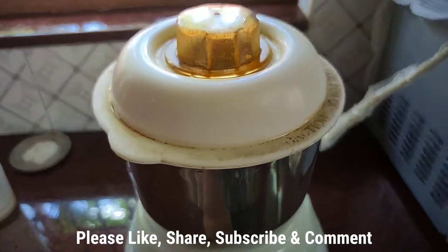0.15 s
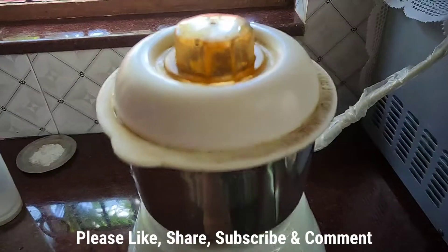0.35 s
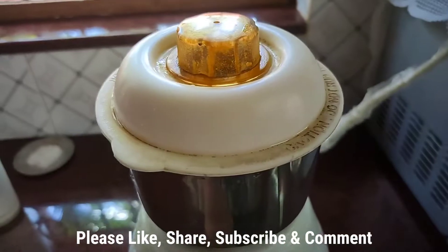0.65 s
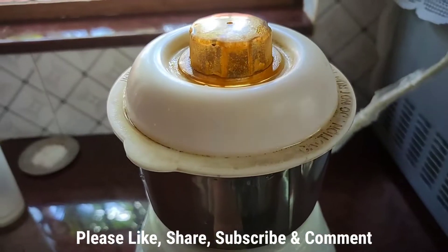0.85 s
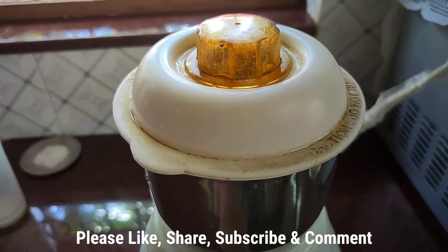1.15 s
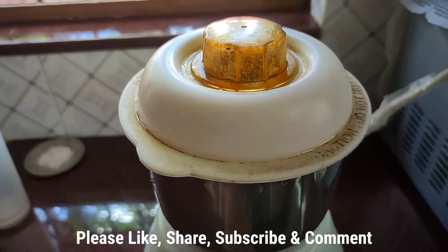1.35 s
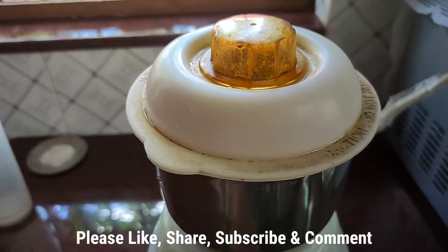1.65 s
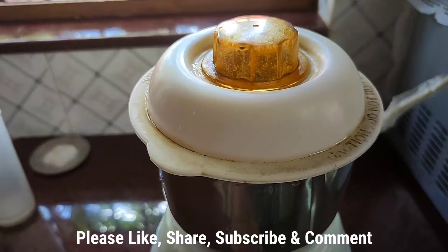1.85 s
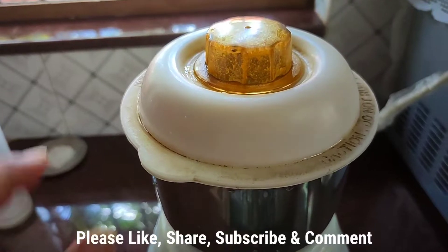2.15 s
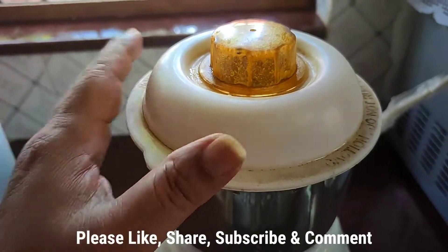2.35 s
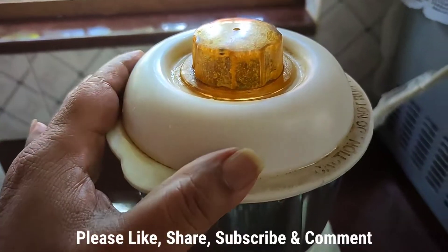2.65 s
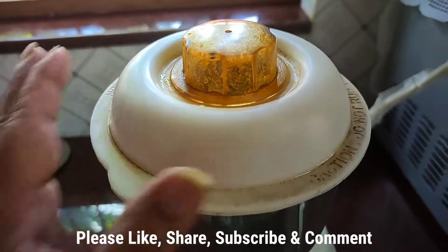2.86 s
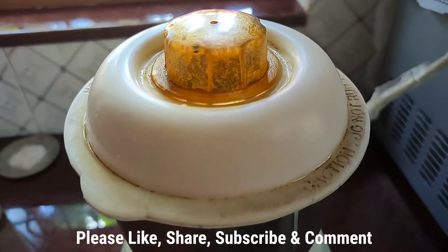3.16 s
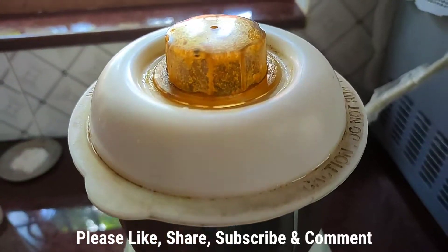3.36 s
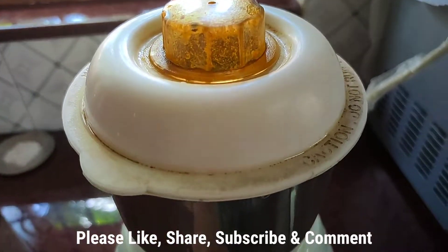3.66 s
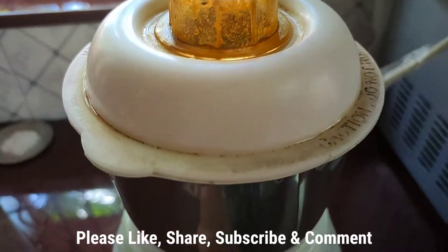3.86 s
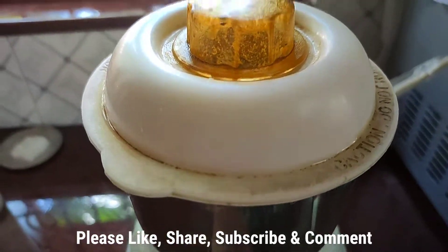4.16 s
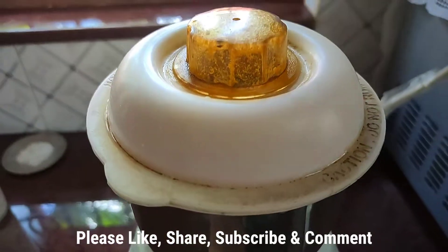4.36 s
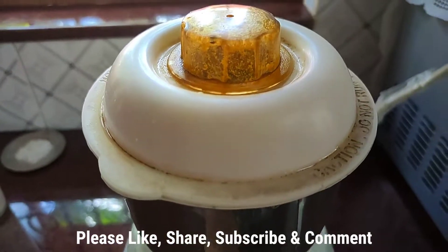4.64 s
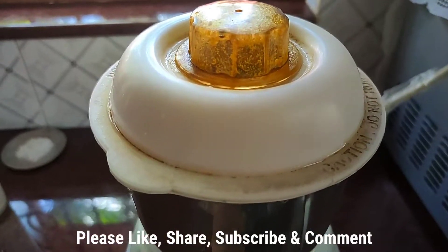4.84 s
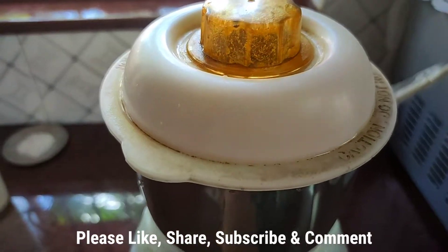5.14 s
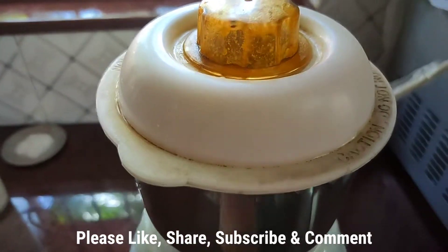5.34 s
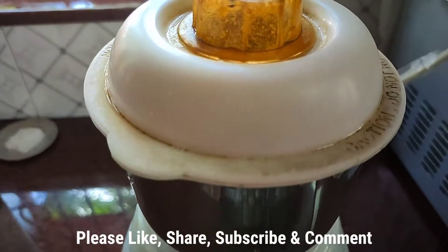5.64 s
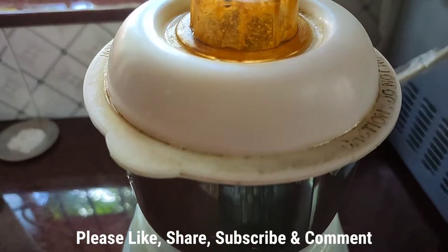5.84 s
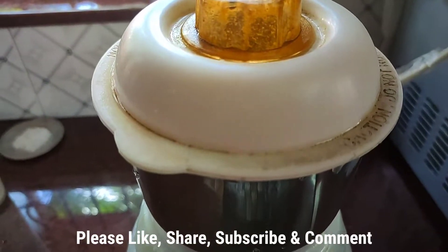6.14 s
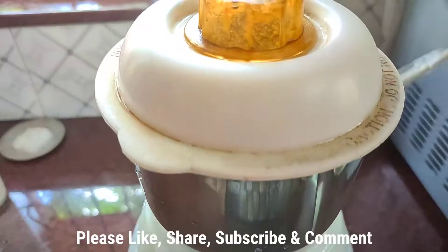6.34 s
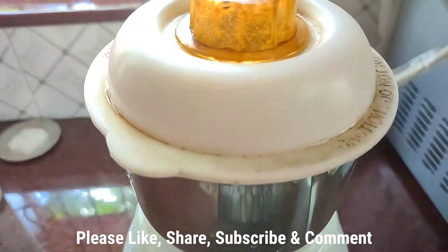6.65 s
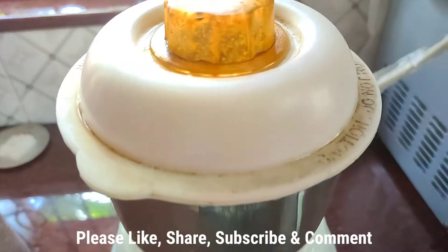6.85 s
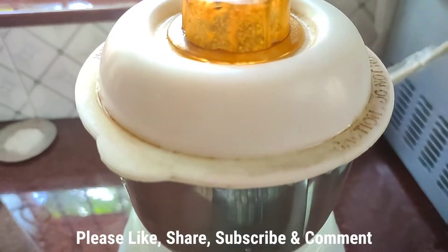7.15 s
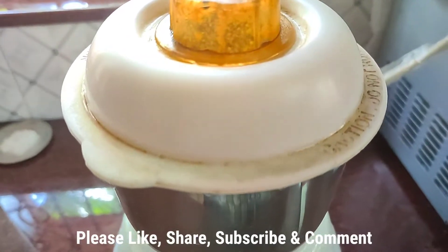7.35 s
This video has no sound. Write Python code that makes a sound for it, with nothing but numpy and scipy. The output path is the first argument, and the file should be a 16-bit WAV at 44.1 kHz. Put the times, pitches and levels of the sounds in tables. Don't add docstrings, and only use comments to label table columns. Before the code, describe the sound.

Close, harsh mixer-grinder noise in two bursts with rattling grit and wet spray, separated by a quiet hum-filled pause with small plastic ticks.

```python
import sys
import numpy as np
from scipy import signal
from scipy.fft import rfft, irfft, next_fast_len
from scipy.io import wavfile
from scipy.ndimage import uniform_filter1d, map_coordinates

SR = 44100
rng = np.random.default_rng(int(sys.argv[2]) if len(sys.argv) > 2 else 0)


def dump_mix(stems):
    frames = np.atleast_2d(stems).T
    limited = np.clip(frames, -1, 1)
    pcm = np.round(limited * 32767).astype(np.int16)
    wavfile.write(sys.argv[1], SR, pcm)


def elevation(decibels):
    levels = np.asarray(decibels, float)
    return 10 ** (levels / 20)


N = 330750


def unit(x):
    return x / np.sqrt(np.mean(x ** 2) + 1e-20)


def along(points, hz):
    f, value = np.transpose(points)
    return np.interp(np.log(hz + 1), np.log(f + 1), value)


def curves(*tables):
    t = np.arange(N) / SR
    s, *columns = np.transpose(np.concatenate(tables))
    on = sum((t >= rows[0][0]) & (t <= rows[-1][0] + .01) for rows in tables)
    return [np.interp(t, s, column) for column in columns] + [uniform_filter1d(on * 1., size=130)]


def wobble(rate):
    knots = rng.standard_normal(int(N * rate / SR) + 4)
    return map_coordinates(knots, [np.arange(N) * rate / SR])


def filtered(x, response):
    m = next_fast_len(N + SR // 2)
    return irfft(rfft(x, m) * response(np.fft.rfftfreq(m, 1 / SR)), m)[..., :N]


def rush(spectrum, alike):
    def mid_and_side(hz):
        turn = np.arccos(np.clip(along(alike, hz), -1, 1)) / 2
        return elevation(along(spectrum, hz)) * [np.cos(turn), np.sin(turn)]

    mid, side = filtered(rng.standard_normal((2, N)), mid_and_side)
    return unit(np.array([mid + side, mid - side]))


def ringing(modes):
    def response(f):
        total = 0
        for k, (centre, width, db) in enumerate(modes):
            total = total + (-1) ** k * elevation(db) * 1j * f * width / (centre ** 2 - f ** 2 + 1j * f * width)
        return total

    return response


def resonance(hz, centre_hz, width_hz):
    return 1 / (1 + ((hz - centre_hz) / width_hz) ** 4)


def bursts(rate, spread_db, t60):
    hit = rng.random(N) < rate / SR
    size = elevation(spread_db * np.minimum(rng.exponential(size=N), 4))
    return unit(signal.lfilter([1], [1, -elevation(-60 / (t60 * SR))], hit * size))


def blows(rows, gain_db, t60):
    out, t = np.zeros(N + SR), np.arange(SR // 3) / SR
    for s, db, life in np.broadcast(rows[:, 0], gain_db, t60):
        out[round(s * SR):][:len(t)] += elevation(db - 60 * t / np.clip(life, .004, .4))
    return out[:N]


SWITCH_S = (2.8, 4.838, 7.3195)
REST_START_S, RESTART_S, SCENE_CHANGE_S = SWITCH_S
FULL_HZ = 214
# start_s [s], pitch_hz [turns per s]
SHAFT_SPEED = [
    [(0, 135), (.12, 148), (.28, 176.7), (.42, 186), (.58, 202), (1, 213), (1.3, 214), (1.55, 165),
     (2.5, 35)],
    [(4.85, 95), (5.05, 162.6), (5.11, 174.4), (5.2, 183.5), (5.33, 198), (5.46, 204.5), (5.7, 210),
     (6.3, 213.5), (7.318, 212.5)],
]


def motor():
    hz, on = curves(*SHAFT_SPEED)
    octaves, now = np.log2(hz / FULL_HZ), np.arange(N) / SR
    first_run = now < REST_START_S
    coasting = (now > 1.32) & first_run
    drift_db = 4.5
    shaft_db = -37.5 - 16 * octaves ** 2 + drift_db * wobble(5)
    blade_db = -38 + 16 * octaves + 9 * resonance(4 * hz, 832, 32) + drift_db * wobble(5)
    coarse_db = -5 * first_run
    slot_db = -45 + 25 * resonance(12 * hz, 2225, 190) - 12 * coasting
    slot_rough = np.where(first_run, 1.6, .7)
    vane_db = -34 + 120 * np.log10(hz / FULL_HZ)
    bar_db = slot_db - 20 + 15 * resonance(24 * hz, 4240, 105)
    turn = 2 * np.pi * np.cumsum(hz * (1 + .004 * wobble(25))) / SR
    lag = np.array([[0], [1]])

    def tone(order, db, rough):
        level = elevation(db + 2.5 + 3 * wobble(45))
        return level * np.sin(order * (turn + .05 * lag) + rough * wobble(130))

    unbalance = tone(1, shaft_db, .25) + tone(2, shaft_db - 8, .5)
    blades = tone(4, blade_db - 3.5 + coarse_db, .7)
    slots = tone(12, slot_db - 1.5, slot_rough)
    vanes = tone(14, vane_db + 2, .4)
    bars = tone(24, bar_db, 1.1)
    return on * (unbalance + blades + slots + vanes + bars)


# start_s [s], level_db [dB]
PASTE_LOAD = [
    [(0, -29.5), (.15, -21), (.32, -17.5), (1.1, -18.5), (1.7, -21), (2.1, -20), (2.45, -33), (2.6, -46.5),
     (2.8, -72)],
    [(4.84, -39), (4.86, -21.5), (5, -20), (5.3, -19.5), (5.9, -17), (6.2, -20), (6.6, -16.5), (7.05, -16),
     (7.32, -19)],
]
# start_s [s], depth_db [dB], length_s [s]
LULLS = [(0.101, 8.5, 0.02), (1.227, -0.5, 0.013), (1.387, 2.5, 0.013), (1.484, 2, 0.0089),
         (1.837, 1.5, 0.038), (1.973, 7, 0.037), (2.07, 7, 0.032), (2.206, 6, .035), (2.315, 5.5, 0.043),
         (2.424, 6, 0.0089), (4.933, 6.5, .03), (5.054, 4, 0.022), (5.275, 2.5, 0.017), (6.11, 3, 0.018),
         (6.254, 0, 0.013), (6.968, 1.5, 0.04)]


def load():
    load_db, on = curves(*PASTE_LOAD)
    now = np.arange(N) / SR
    lull_db = sum(db * np.exp(-((now - s) / length) ** 2) for s, db, length in LULLS)
    stop_db = 75 * np.maximum(now - 2.47, 0) * (now < RESTART_S)
    over_db = load_db + 18
    jar_db = load_db - lull_db
    housing_db = -25 + 0.83 * over_db - 0.34 * lull_db
    spray_db = -21.5 + 0.79 * over_db - 1.5 * lull_db - stop_db
    return jar_db, housing_db, spray_db, on


FLAT = [(20, 0)]
# pitch_hz [Hz], width_hz [Hz], level_db [dB]
JAR = [(832, 45, -3), (1510, 95, 2), (1750, 150, -5), (1960, 100, -4), (2160, 120, -1), (2550, 150, -4),
       (2855, 85, 2), (3125, 40, -3), (3428, 32, -1), (3870, 40, -3), (4156, 55, -5), (4346, 60, -5)]
# pitch_hz [Hz], level_db [dB per Hz]
HOUSING = [(24, -47.5), (40, -14.5), (107, -20), (182, -6.5), (205, -9), (242, -0.5), (307, 2), (395, 2),
           (565, -8.5), (819, 0), (896, -7), (1120, -15), (1400, -1.5), (1820, -35), (3080, -120)]
# pitch_hz [Hz], level_db [dB per Hz]
WASH = [(590, -44.5), (1000, -5.5), (1270, -12.5), (1490, -3), (1860, -4), (2750, -3), (3250, -7),
        (5500, -12.5), (7400, -72)]
# pitch_hz [Hz], level_db [dB per Hz]
SPRAY = [(2650, -41), (4500, -3.5), (5770, -2.5), (11300, 1), (12300, -0.5), (13400, -4), (15200, -2),
         (16000, -31)]
# pitch_hz [Hz], likeness [-1 to 1]
NEAR_ALIKE = [(60, 0.45), (130, 0.62), (290, 0.93), (640, 0.79), (1410, 0.26), (3100, 0.035),
              (6820, 0.0225), (15000, 0.047)]


def churn():
    jar_db, housing_db, spray_db, on = load()
    slop = bursts(70, spread_db=3.5, t60=0.1)
    grit = bursts(500, spread_db=3, t60=0.019)
    pelt = unit(0.48 + 0.43 * slop + 0.38 * grit)
    wall = unit(filtered(pelt * rush(FLAT, NEAR_ALIKE), ringing(JAR)))
    jar = unit(wall + elevation(-1.0) * pelt * rush(WASH, NEAR_ALIKE))
    housing = unit((2.0 + 0.1 * slop) * elevation(0.91 * wobble(30)) * rush(HOUSING, NEAR_ALIKE))

    drops = rush(SPRAY, NEAR_ALIKE)
    below_fine = filtered(drops, lambda hz: 1 / (1 + (hz / 10000) ** 8))
    coarse = filtered(below_fine, lambda hz: 1 / (1 + (hz / 7500) ** 8))
    spray = 0
    for size in (coarse, below_fine - coarse, drops - below_fine):
        splash = 0.3 + 0.39 * slop + .5 * bursts(700, spread_db=3.0, t60=0.0069)
        spray = spray + elevation(2.4 * wobble(20)) * splash * size
    return on * (elevation(jar_db + 1.5) * jar + elevation(housing_db + 1.0) * housing + elevation(spray_db + 4.5) * unit(spray))


# [spray share, dB]
LUMPS = [(.008, -3, -12.5), (0.065, -7.5, -2.5), (0.131, -3.5, -2.5), (0.265, -3, -2.5), (.309, -10, -11.5),
         (.394, -10, -6.5), (.562, -7.5, -9), (0.58, 0, -6.5), (.686, -9, -2.5), (0.726, -5, 2),
         (.942, -13, -11), (1.065, -4.5, -10), (1.142, -5, -4), (1.174, 2, -13), (1.302, 3, -2.5),
         (1.43, -1.5, -2.5), (1.518, -8, 4), (1.582, -5, -7.5), (1.654, -17, -13.5), (1.711, -4, -12.5),
         (1.745, -3.5, -8), (1.815, -13, -19), (1.878, -5, -6), (2, -4, -7), (2.055, -11.5, -8),
         (2.134, -8, -5.5), (2.191, -14, -19), (2.244, -5, -7.5), (2.367, -8.5, -10), (2.44, -17.5, -14),
         (4.852, -20.5, 0.5), (4.885, -11, 0), (4.933, -12.5, -9.5), (4.966, -14.5, -3),
               (5.003, -4, -18), (5.036, -2, -6), (5.19, -3, -2), (5.31, 1, -11), (5.39, -4, 1),
               (5.458, -3, -12.5), (5.591, -4.5, -15), (5.663, 0.5, -6.5), (5.733, -10.5, -13.5),
               (5.868, -9, 2), (5.929, -0.5, -4.5), (6.165, -5, -0.5), (6.275, 1, -5), (6.35, -1.5, -6.5),
               (6.385, -1, -8.5), (6.513, -5.5, -7.5), (6.586, -3, -7), (6.644, -11.5, -14),
               (6.684, -1, -10.5), (6.726, -8, 0.5), (6.881, 1, -7.5), (6.949, -5.5, -23.5),
               (7.015, -2, -12), (7.065, 3, -4.5), (7.145, -4, -11.5), (7.206, -4, -11)]
# start_s [s], level_db [peak dB]
SEEDS = [(0.0295, 0), (0.1248, -5), (0.213, -7.5), (0.3336, -2.5), (.4304, -11), (0.5584, -5), (0.6318, -3),
         (0.812, 1.5), (0.9654, -6.5), (1.1398, -5.5), (1.501, -5.5), (1.711, -6.5), (1.8106, -12),
         (1.884, -11), (1.9962, -3.5), (2.016, -4), (2.0697, -9.5), (2.135, -9), (2.28, -8.5),
         (2.4334, -25), (2.5474, -26.5), (2.701, -35.5), (4.8393, -11.5), (4.893, -10), (4.987, -6),
         (5.764, -2), (6.0313, -6), (6.1755, 13), (6.405, 1), (6.972, -5)]


def lumps():
    rows, seeds = np.array(LUMPS), np.array(SEEDS)
    lump_db, spray_share_db = rows[:, 1], rows[:, 2]
    t60_s, swell_s, spray_swell_s = 0.087, .014, .007
    rasp = uniform_filter1d(blows(rows, lump_db + 4.3, t60_s), size=round(swell_s * SR))
    wall = filtered(rasp * rush(FLAT, NEAR_ALIKE), ringing(JAR))
    scrape = elevation(-17.5) * rasp * rush(WASH, NEAR_ALIKE)
    thud = elevation(-19) * rasp * rush(HOUSING, NEAR_ALIKE)
    throw = blows(rows, lump_db + spray_share_db - 6, 1.4 * t60_s)
    spray = uniform_filter1d(throw, size=round(spray_swell_s * SR)) * rush(SPRAY, NEAR_ALIKE)
    bright = [(2500, -47.0), (5000, -7.5), (9000, 0.5), (16000, -3.5)]  # (Hz, dB per Hz)
    crack = blows(seeds, seeds[:, 1] + 1, 0.015) * rush(bright, NEAR_ALIKE)
    return wall + scrape + thud + spray + crack


# pitch_hz [Hz], width_hz [Hz], level_db [dB]
BASE = [(151, 42, 1), (233, 62, -9), (389.6, 26, 6.5)]
# start_s [s], level_db [dB]
BUMPS = [
    (.128, -23),
    (.6, -29),
    (1.3, -27.5),
    (1.995, -30.5),
    (5.21, -29),
]
# start_s [s], level_db [dB]
KICKS = [
    (.135, -40.5),
    (4.85, -22),
]


def base():
    hz, _ = curves(*SHAFT_SPEED)
    now = np.arange(N) / SR
    resting_s = np.maximum(now - 2.52, 0) * (now < RESTART_S)
    level = elevation(-46 + 12.5 * (1 - hz / FULL_HZ) - 260.5 * resting_s)
    for s, db in KICKS:
        level = level + elevation(db - 60 * np.abs(now - s) / 0.17) * (now > s)
    hum = unit(filtered(rush(FLAT, NEAR_ALIKE), ringing(BASE)))
    rock = level * elevation(1.9 * wobble(25)) * hum
    rows = np.array(BUMPS)
    return rock + filtered(blows(rows, rows[:, 1], 0.037), ringing([(68.7, 110, 3)]))


# [bright part, dB]
TICKS = [
    (2.4342, -7, -12.5),
    (2.7194, -40, -15.5),
    (3.8716, -36.5, -7),
    (4.437, -27.5, -9),
    (4.4887, -50, -9),
    (4.5459, -37.5, -15),
    (4.582, -40, -21),
    (4.6533, -37, -8.5),
    (4.7087, -42, -20),
    (4.7657, -47, -8),
]


def ticks():
    rows = np.array(TICKS)

    def click(db):
        answer = blows(rows, db - 11, .11)
        return (blows(rows, db + 2, .01) + answer) * rush(FLAT, NEAR_ALIKE)

    knob = filtered(click(rows[:, 1] + 8), ringing([(1574, 480, -2.0), (2070, 380, 0.4)]))
    snap_modes = [(3320, 900, 5.0), (4300, 1100, 6.5), (7500, 4600, -13.5)]
    return knob + filtered(click(rows[:, 1] + rows[:, 2] + 4), ringing(snap_modes))


# start_s [s], level_db [dB], recovery_s [s]
POP = (5.788, -2.4, 0.029)


def pop():
    s, db, recovery = POP
    u = np.maximum(np.arange(N) / SR - s, 0) / recovery
    step = -elevation(db) * (1 - np.exp(-u / 0.022)) * (1 - u) * np.exp(-.7 * u)
    return step * [[0], [1]]


# start_s [s], pitch_hz [Hz], level_db [dB]
BIRD = [
    (7.33, 4960, -55),
    (7.36, 4985, -55),
    (7.42, 5050, -57),
    (7.46, 5110, -56),
    (7.5, 5200, -53),
]


def bird():
    hz, db, on = curves(BIRD)
    warble = np.clip((hz - 4950) / 120, .3, 1.4)
    phase = 2 * np.pi * np.cumsum(hz) / SR + warble * np.array([wobble(250), wobble(170)])
    return on * elevation(db + 5.5 + 2.8 * wobble(86)) * np.sin(phase)


# pitch_hz [Hz], level_db [dB per Hz]
KITCHEN = [(12, -30), (20, -1.5), (58, -6), (96, -26.5), (142, -12), (255, -11), (301, -18), (367, -11),
           (780, -25.5), (1710, -31.5), (2460, -27.5), (4940, -33.5), (9670, -28), (14700, -35.5),
           (16000, -43.5)]
# pitch_hz [Hz], likeness [-1 to 1]
ROOM_ALIKE = [(60, 0.72), (130, 0.94), (290, 0.79), (640, 0.53), (1410, -0.14), (3100, -0.17), (6820, 0.56),
              (15000, 0.85)]
# pitch_hz [Hz], level_db [dB rms]
HUM = [(48.4, -53.5), (102.3, -61), (199.2, -62), (253.0, -61), (360.7, -59), (446.8, -82), (495.3, -70.5)]


def kitchen():
    t = np.arange(N) / SR
    hum = 0
    for hz, db in HUM:
        hum = hum + elevation(db + 3 + 0.97 * wobble(4.6)) * np.sin(2 * np.pi * hz * t + .5 * wobble(5))
    room_db = np.where(t < SCENE_CHANGE_S, -47, -44)
    return elevation(room_db - 3 + .3 * wobble(5.5)) * rush(KITCHEN, ROOM_ALIKE) + hum


def tiles(grinder):
    t = np.arange(SR // 8) / SR
    tail = rng.standard_normal((2, len(t))) * elevation(-60 * t / .09)
    return elevation(-18) * signal.fftconvolve(grinder, tail / np.linalg.norm(tail[0]), axes=1)[:, :N]


# [left minus right, dB]
NEAR_SIDE = [(60, 4), (110, -1), (200, -1.0), (380, 0.5), (700, -1), (1290, 4), (2380, 5), (4400, 5.5),
             (8120, -0.5), (15000, 3)]


def scene():
    now = np.arange(N) / SR
    running = ((now < REST_START_S) | (now > RESTART_S)) * (now < SCENE_CHANGE_S)
    grinder = (motor() + churn() + lumps() + base()) * running
    close = grinder + tiles(grinder) + ticks()
    near = filtered(close, lambda hz: elevation(along(NEAR_SIDE, hz) * [[.5], [-.5]]))
    return near + pop() + bird() + kitchen()


def band_limit(x):
    return signal.sosfilt(signal.butter(12, 15900, fs=SR, output="sos"), x)


def record(dry):
    clipped = dry / (1 + np.abs(dry) ** 8) ** (1 / 8)
    kept = filtered(clipped, lambda hz: hz < 15850)
    return band_limit(.9 * kept)


dry = scene()
out = record(dry)
dump_mix(out)
```